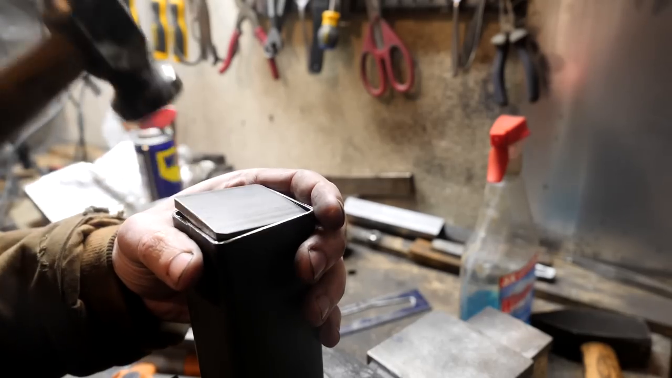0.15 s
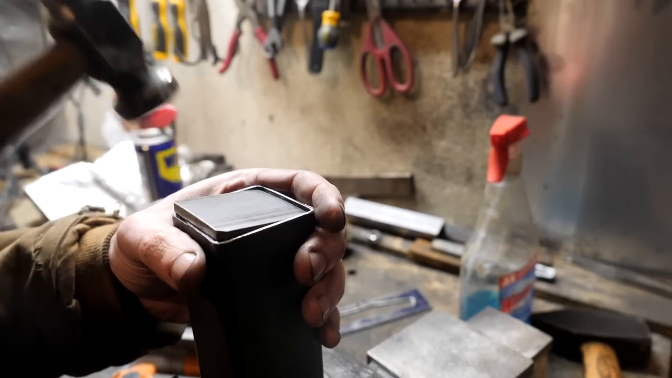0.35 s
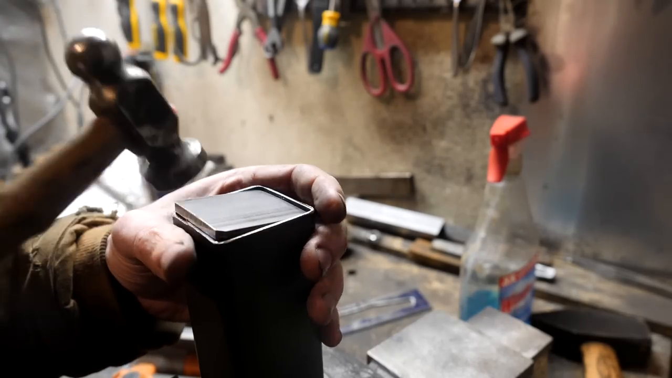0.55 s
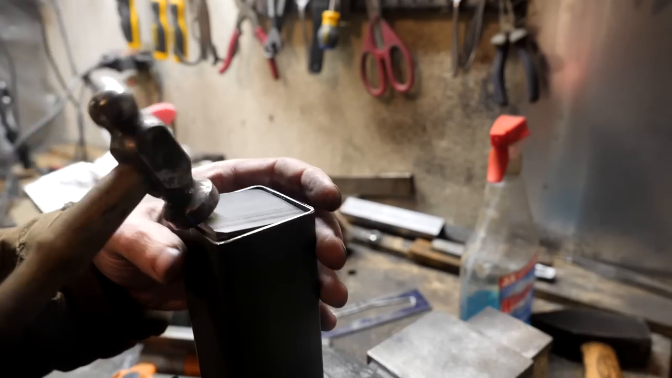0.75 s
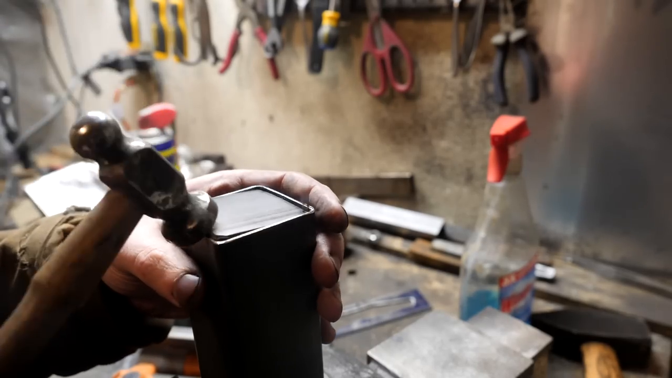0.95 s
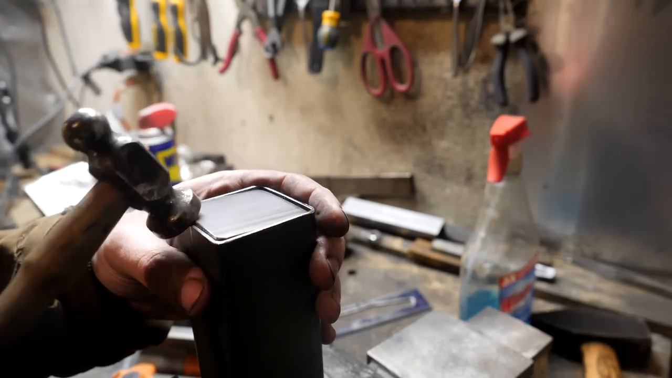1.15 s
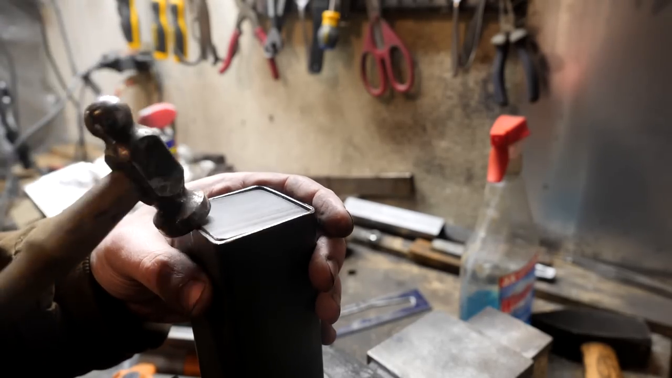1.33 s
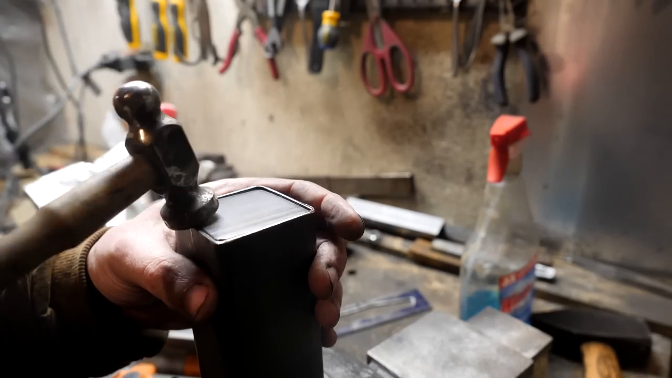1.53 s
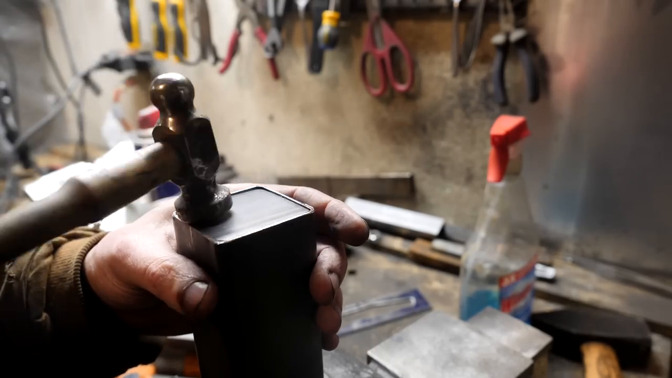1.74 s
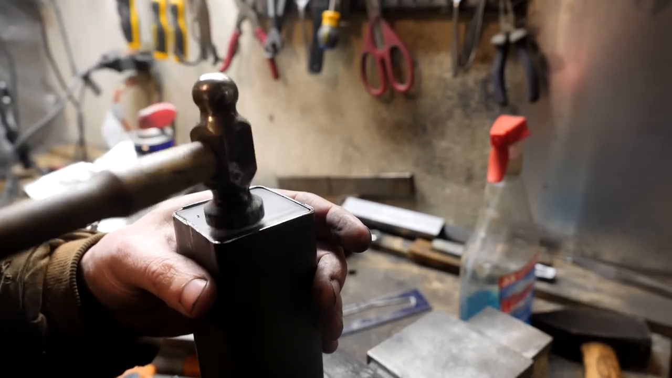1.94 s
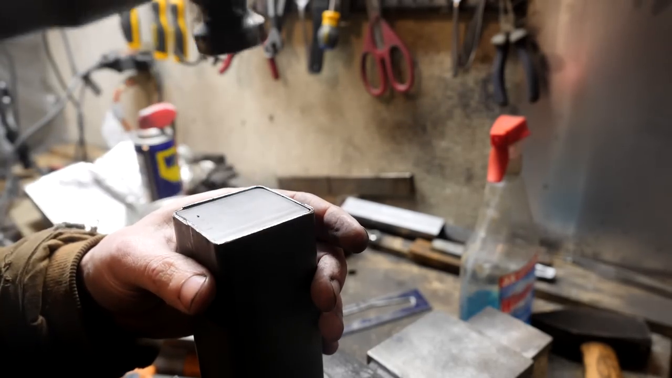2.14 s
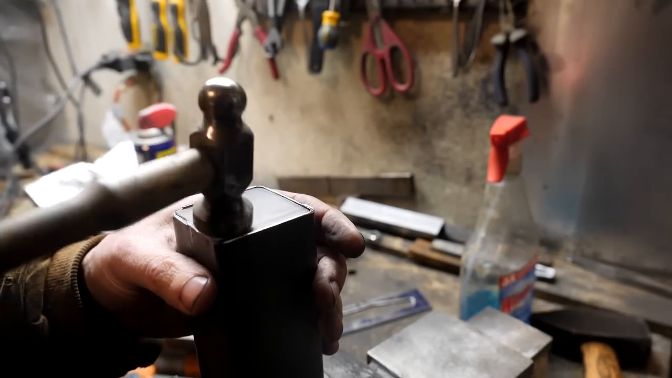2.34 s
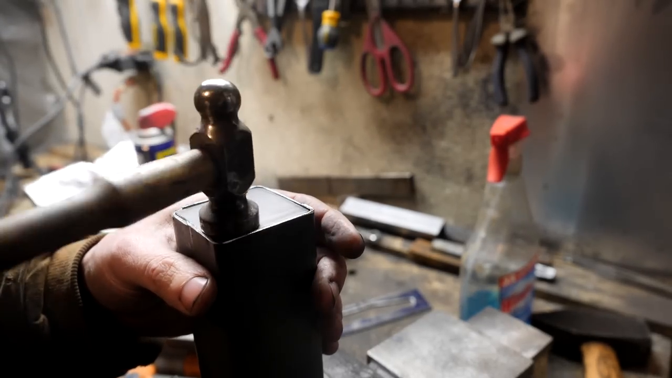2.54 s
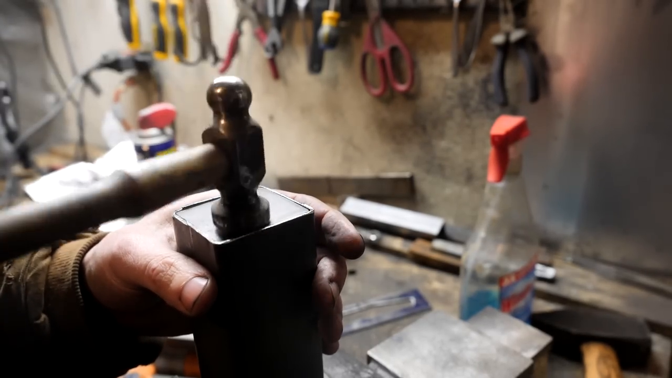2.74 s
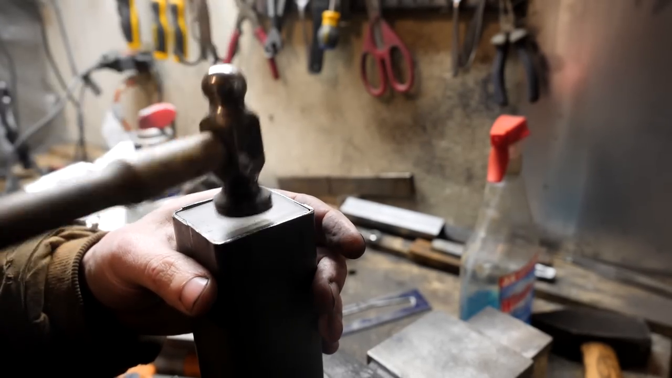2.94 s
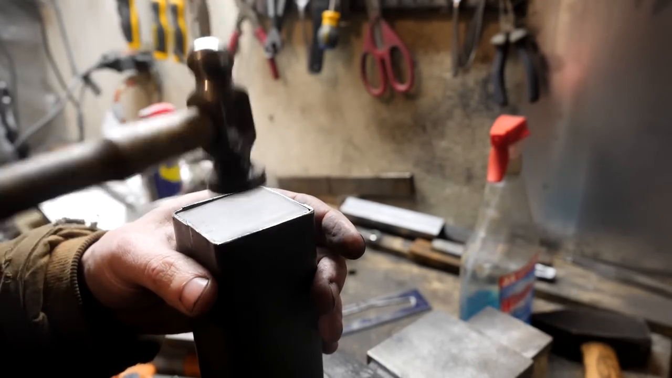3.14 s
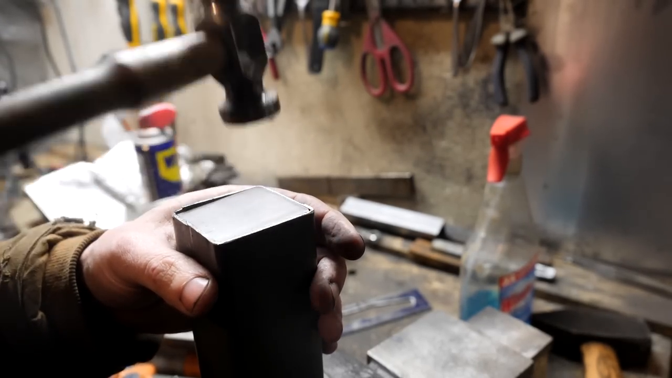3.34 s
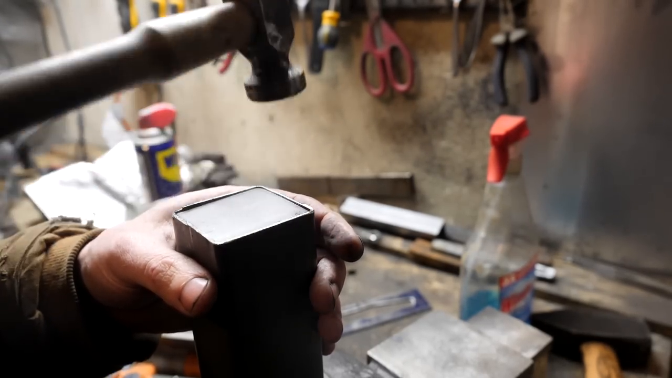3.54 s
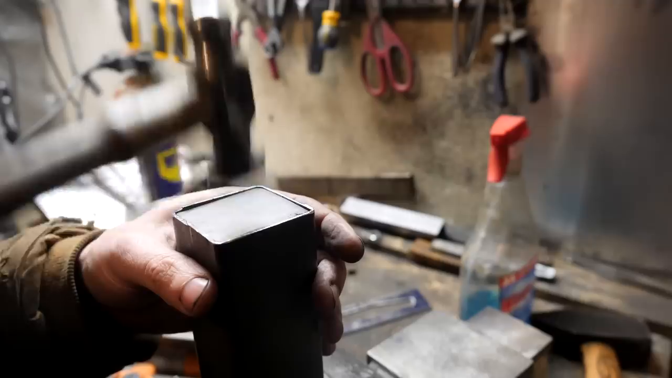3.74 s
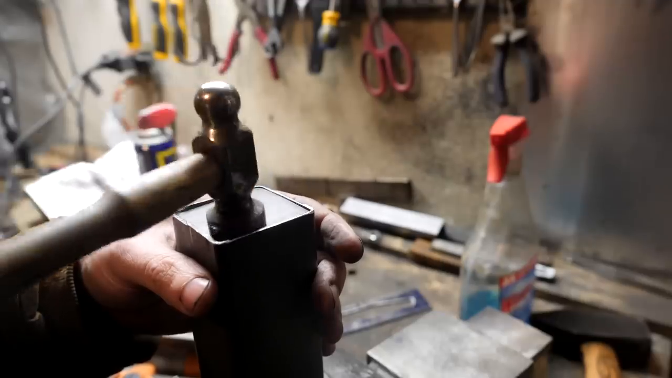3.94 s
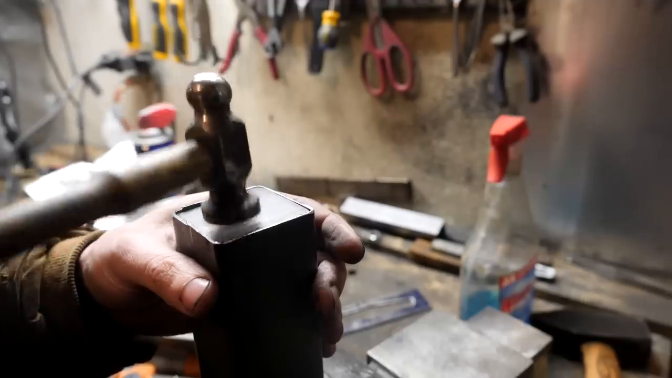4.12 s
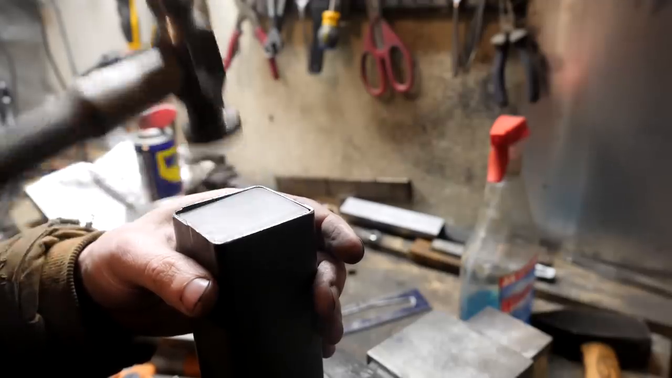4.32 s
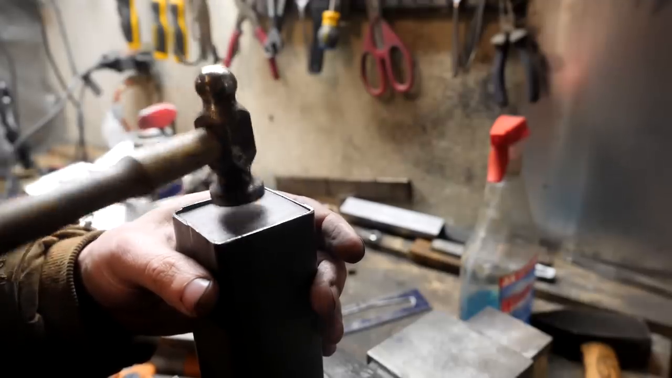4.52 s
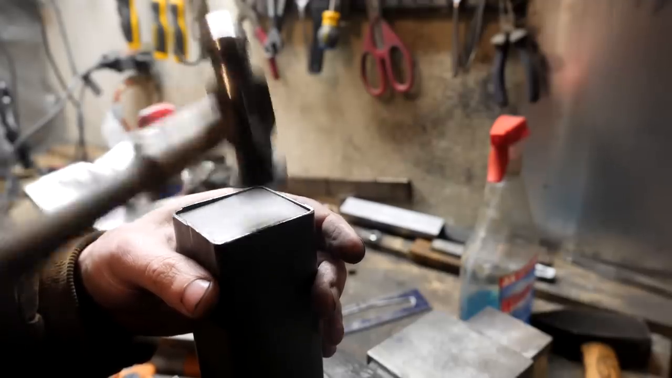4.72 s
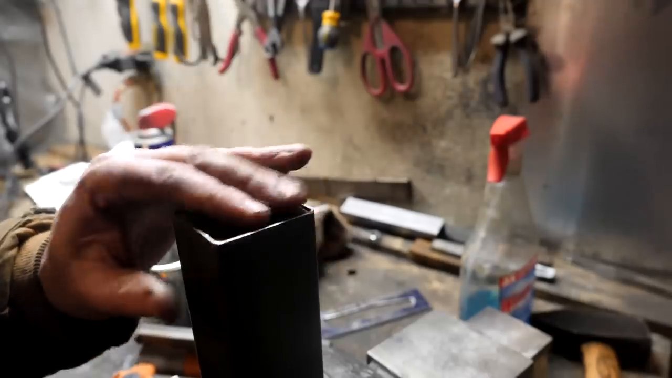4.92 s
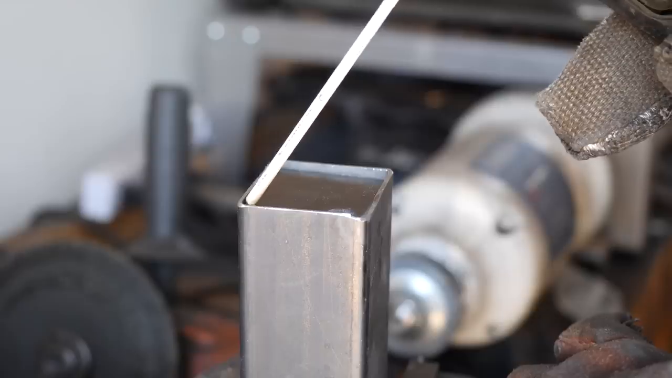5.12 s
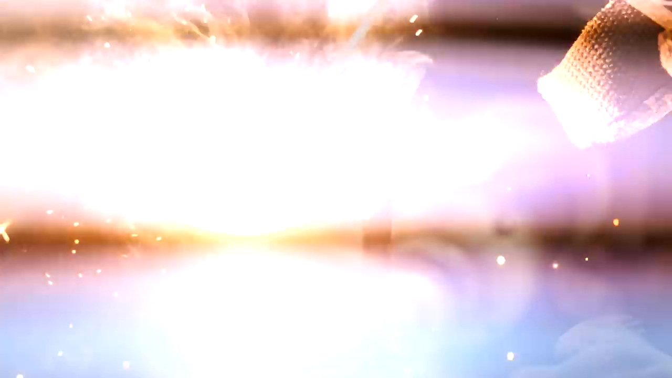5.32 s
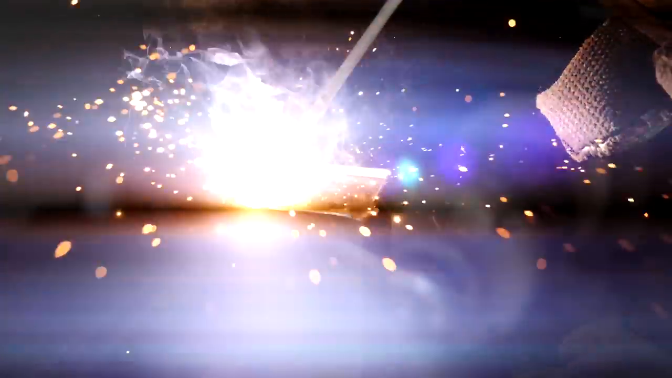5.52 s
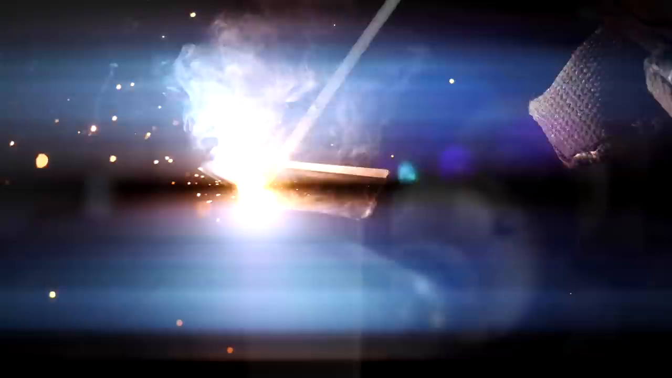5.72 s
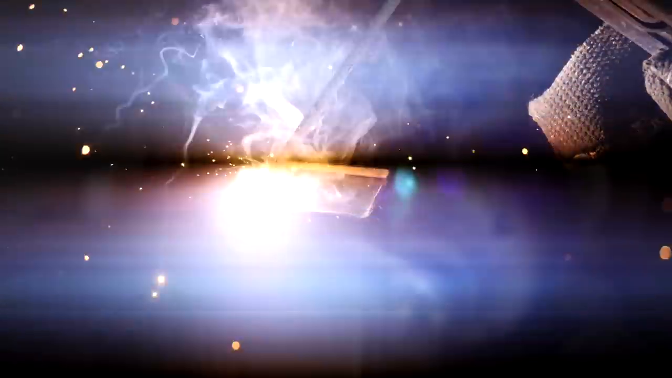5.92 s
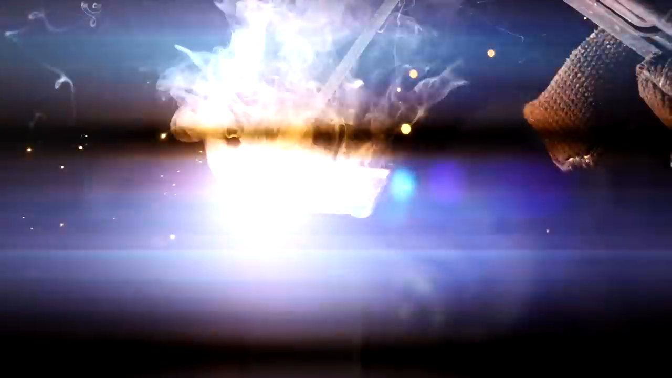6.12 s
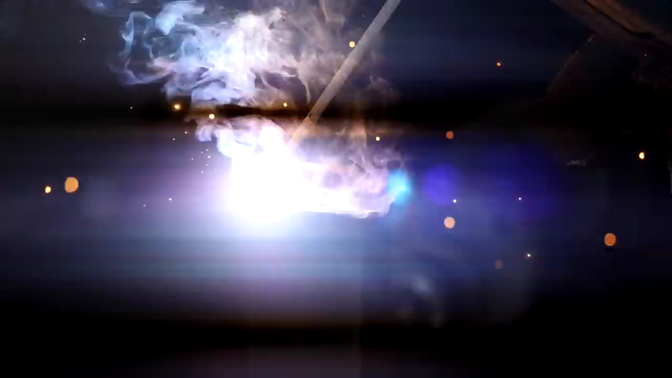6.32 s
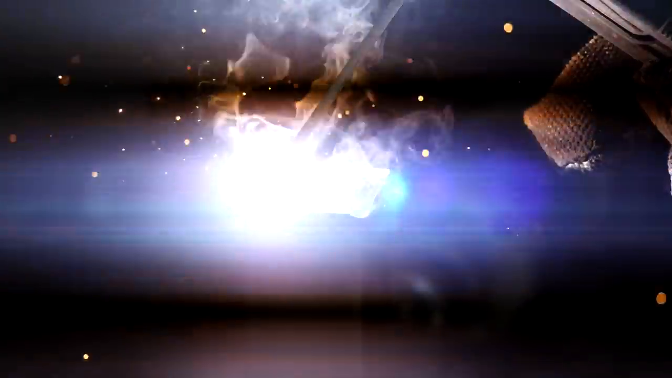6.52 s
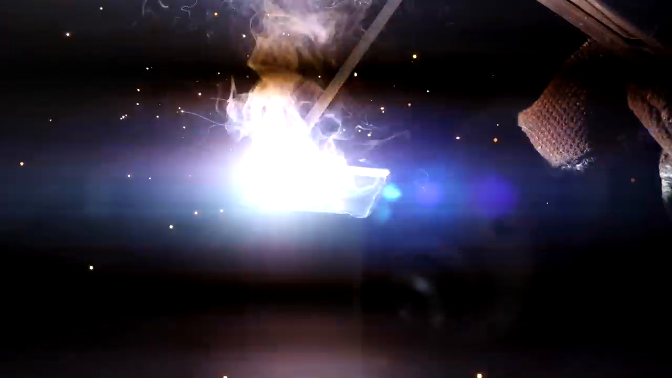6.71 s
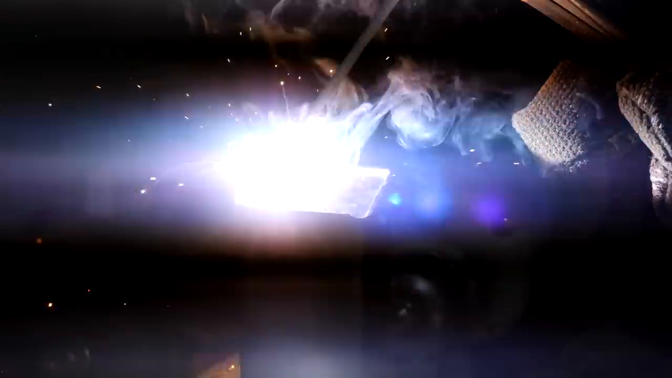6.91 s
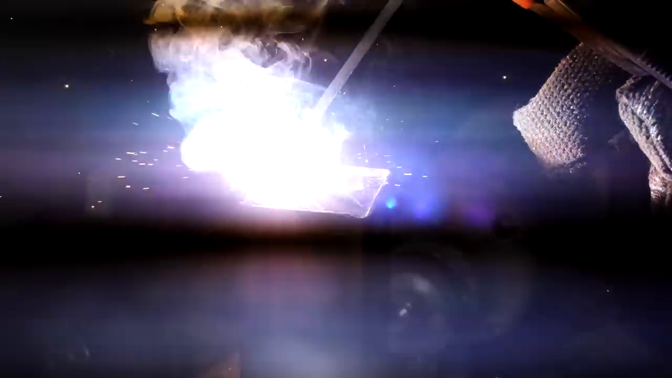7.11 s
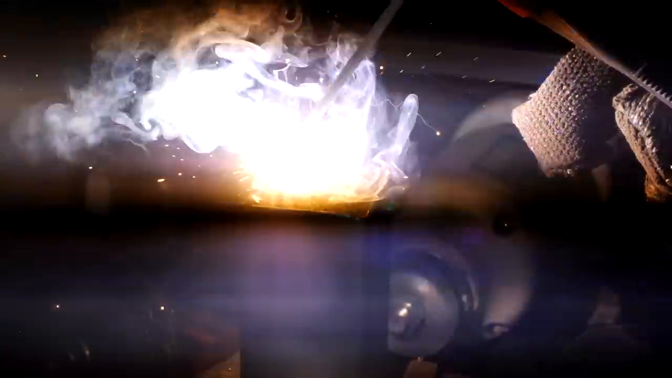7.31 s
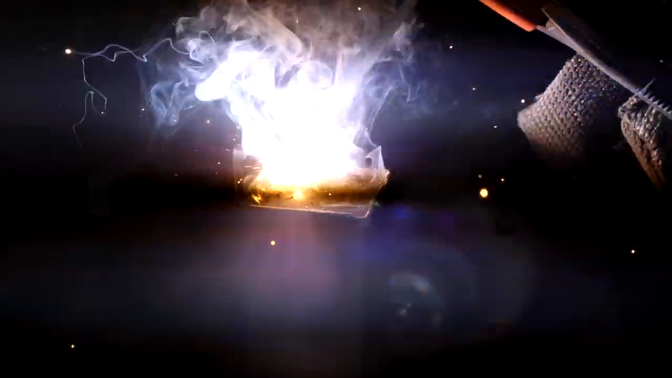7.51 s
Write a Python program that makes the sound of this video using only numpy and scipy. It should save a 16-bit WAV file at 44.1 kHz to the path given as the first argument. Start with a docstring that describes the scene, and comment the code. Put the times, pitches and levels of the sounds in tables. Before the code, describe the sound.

Quick bright hammer blows on hollow steel in a small workshop give way abruptly to a humming welder and a sizzling, popping electric arc.

```python
"""Capping a steel tube

A hammer taps a steel cap into a hand-held square tube in a small workshop; then comes arc welding.
Blows are shaped noise plus dying partials; a limiter ducks each one, so the ringing room swells up behind it.
The welder is unsteady sines plus rushing noise: it idles with a hum and a whine, then surges at the strike.
The arc is rippling noise that settles into a steady hiss with popping drops."""
import sys
import numpy as np
from scipy import signal
from scipy.fft import rfft, irfft, next_fast_len
from scipy.io import wavfile
from scipy.ndimage import uniform_filter1d, minimum_filter1d

SR = 44100
rng = np.random.default_rng(int(sys.argv[2]) if len(sys.argv) > 2 else 0)


def store_pcm(level_fs):
    """Save levels as 16-bit WAV."""
    pcm = np.round(np.clip(level_fs, -1, 1) * 32767).astype(np.int16)
    wavfile.write(sys.argv[1], SR, np.atleast_2d(pcm).T)


N = 337806
TIME = np.arange(N) / SR
EDGE_HZ = 15900


def amp(db):
    """Decibels to gain."""
    return 10 ** (np.asarray(db) / 20)


def evened(x):
    """Scales to rms 1."""
    return x / np.sqrt(np.mean(x ** 2) + 1e-20)


def read(points, hz):
    """Joins table rows on a log-frequency axis."""
    f, value = np.transpose(points)
    return np.interp(np.log(hz + 1), np.log(f + 1), value)


def bump(x, centre, width):
    """A Gaussian peak of height 1, down to 1/e at one width from the centre."""
    return np.exp(-((x - centre) / width) ** 2)


def add(mix, start_s, sound):
    """Mixes a stereo sound in at its start time."""
    part = mix[:, round(start_s * SR):][:, :sound.shape[1]]
    part += sound[:, :part.shape[1]]


def tint(x, colour_db):
    size = next_fast_len(x.shape[1])
    hz = np.fft.rfftfreq(size, 1 / SR)
    spectrum = rfft(x, size) * amp(colour_db(hz)) * (hz < EDGE_HZ)
    return irfft(spectrum, size)[:, :x.shape[1]]


def noise(size, colour_db, same, envelope=1):
    """Coloured stereo noise with a left-right likeness, as strong as the envelope that excites it."""
    def mid_db(hz):
        return colour_db(hz) + 10 * np.log10(1 + np.clip(read(same, hz), 0, 1))

    def side_db(hz):
        return colour_db(hz) + 10 * np.log10(np.clip(1 - read(same, hz), 1e-3, 1))

    mid, side = rng.standard_normal((2, 1, size)) * envelope
    mid, side = tint(mid, mid_db), tint(side, side_db)
    return evened(np.vstack([mid + side, mid - side])) * np.sqrt(np.mean(np.square(envelope)))


def drift(rate_hz):
    """Slow chance of rms 1."""
    size = 2 ** 19
    hz = np.fft.rfftfreq(size, 1 / SR)
    spectrum = rfft(rng.standard_normal(size)) * bump(hz, 0, rate_hz)
    return evened(irfft(spectrum)[:N])


# corners of a blow's contact colour: frequency [Hz]
BLOW_BANDS_HZ = [700, 3000, 7500, 14000]
# direct crack, base colour: (frequency [Hz], relative density [dB])
CRACK_COLOUR = [(40, -15), (150, -13.5), (400, 2), (1200, 3), (2000, -0.5), (3000, 2.5), (5000, 0.5),
                (7000, 3.5), (10000, -1), (14500, 0.5), (15800, 6.5)]
# workshop's answer to a blow, base colour: (frequency [Hz], relative density [dB])
TAIL_COLOUR = [(40, -36), (100, -24.5), (160, -8), (260, -7), (400, 2), (700, -1), (1200, 2.5), (3000, 0.5),
               (7000, 4), (11000, 3), (14000, 3.5), (15800, -3.5)]
# decay of the workshop: (frequency [Hz], t60 [s])
ROOM_T60 = [(150, 0.34), (500, 0.37), (1500, 0.34), (4000, 0.36), (8000, 0.31), (15000, 0.25)]
# modes of the tube and its air: (frequency [Hz], width [Hz], gain [dB])
TUBE_MODES = [(284.7, 13.6, 12.5), (420, 25, 3), (552, 14, -6), (1579, 21, 11), (2200, 16, 6.5),
              (2760, 57, 3), (3040, 27, 5.5)]
# stereo image of the workshop: (frequency [Hz], left-right likeness [0-1])
ROOM_SAME = [(60, 0.96), (250, 0.98), (640, 0.96), (1400, 0.8), (3100, 0.65), (7000, 0.74), (15000, 0.81)]
# a square blow wakes both the ring and the thud of the tube
THUD_DB, THUD_DB_PER_RING_DB, THUD_DB_PER_CLANG_DB = 4.5, 0.14, 0.057
# hard, clanging blows hold less of the top treble
TOP_DB, TOP_DB_PER_FORCE_DB, TOP_DB_PER_CLANG_DB = 0, -0.8, -0.29
# clanging blows crack lower
TILT_DB_PER_OCTAVE, TILT_CHANGE_PER_CLANG_DB = 3.2, -0.061


def blow(force_db, clang_db, ring_hz, ring_db, crack_hz, tube_db):
    """One blow: a crack that dies in milliseconds and the diffuse ringing of tube and room."""
    t = TIME[:SR // 2]
    grid_hz = np.linspace(0, EDGE_HZ, num=60)
    # slight random unevenness of the treble, new for each blow
    uneven_db = 1.73 * rng.standard_normal(len(grid_hz)) * (grid_hz > 2000)
    thud_db = THUD_DB + THUD_DB_PER_RING_DB * tube_db + THUD_DB_PER_CLANG_DB * clang_db - force_db
    top_db = TOP_DB + TOP_DB_PER_FORCE_DB * force_db + TOP_DB_PER_CLANG_DB * clang_db
    tilt_db = TILT_DB_PER_OCTAVE + TILT_CHANGE_PER_CLANG_DB * clang_db

    def contact_db(hz):
        """Where the hammer lands and how tightly the cap sits colour the sound."""
        bands_db = np.interp(np.log(hz + 1), np.log(BLOW_BANDS_HZ), [thud_db, clang_db, 0, top_db])
        return bands_db + ring_db * bump(hz, ring_hz, 1000) + np.interp(hz, grid_hz, uneven_db)

    def direct_db(hz):
        """The close sound is tilted in pitch and has a ring of its own."""
        tilted_db = tilt_db * np.log2((hz + 300) / 5000)
        return read(CRACK_COLOUR, hz) + contact_db(hz) + tilted_db + 6 * bump(hz, crack_hz, 290)

    early = t[:SR // 16]
    crack = noise(len(early), direct_db, [(100, 0.59), (500, 0.92), (3000, 0.72), (15000, 0.95)])
    chatter = bump(early, 0, 0.0034)  # steel on steel
    ring_out = amp(-2.5 - 60 * early / 0.044)
    crack *= amp(-5 + force_db) * (chatter + ring_out)

    diffuse = noise(len(t), lambda hz: read(TAIL_COLOUR, hz), ROOM_SAME)
    hz, age_s, cells = signal.stft(diffuse, SR, nperseg=1024, noverlap=768)
    colour_db = contact_db(hz) + sum(db * bump(hz, f, width) for f, width, db in TUBE_MODES)
    decay_db = -60 * age_s / read(ROOM_T60, hz)[:, None]
    cells = cells * amp(colour_db[:, None] + decay_db)
    tail = signal.istft(cells, SR, nperseg=1024, noverlap=768)[1][:, :len(t)]
    build_up = 1 - np.exp(-t / 0.0017)  # reflections take a moment
    sound = amp(-23.0 + force_db) * tail * build_up
    add(sound, 0, crack)
    return sound


def partial(db, hz, t60_s):
    """One dying mode; the room blurs it into a cluster of close tones."""
    t = TIME[:SR // 2]
    spread_hz, phase = 16 * rng.standard_normal((8, 1)), rng.random((8, 1))
    cluster = np.sin(2 * np.pi * ((hz + spread_hz) * t + phase)).sum(0)
    tone = evened(cluster) / np.sqrt(2)
    return np.tile(amp(db - 60 * t / t60_s) * tone, (2, 1))


# hammer blows: (time [s], force [dB], clang of the cap [dB], cap ring [Hz], cap ring [dB],
# crack ring [Hz], ring of the tube [dB])
BLOWS = [(0.0829, 0, 2.5, 12400, 11, 12600, -25), (0.2909, 0, 1.5, 10500, 4, 11800, -25),
         (0.492, 8, -2, 2260, 6, 10700, -21), (0.822, 3.5, 2.3, 2880, 2.5, 6820, -24),
         (1.004, 2, 0, 11000, 7.5, 10200, -19), (1.1976, 1.5, 6.5, 11100, 7, 3900, -12),
         (1.403, 2.5, 8, 4840, 3, 5100, -15), (1.5892, 1.5, 10, 12300, 6, 5200, -9),
         (1.7795, -1, 10, 12000, 8, 12100, -4.5), (1.9566, -2, 0, 9500, 4, 14700, -14),
         (2.359, -0.8, 7.5, 11500, 4.5, 2750, -2.5), (2.558, 1.5, 9, 4740, 1, 2750, -4),
         (2.754, 0, -0.5, 8200, 6, 14000, -6), (2.936, 0, 1, 9130, 7.5, 8300, -2.5),
         (3.1228, 0.3, 1, 8150, 2, 14700, -3), (3.3024, -0.3, -1, 15000, 7, 14000, -5),
         (3.4747, 0, -5.5, 6850, 3.5, 14100, -9), (3.65, 3.7, 7.5, 4820, 1, 7030, -16),
         (3.826, 2.5, 0.5, 14990, 1, 14300, -8), (3.9841, -3.5, 2.1, 7900, 6.5, 14000, -3.5),
         (4.1344, -2.5, -2, 12230, 2, 12300, -9), (4.277, -1, -5, 2620, 5, 14000, -11),
         (4.4118, 0.5, -0.5, 14500, 1, 15500, -11), (4.5473, 0.2, 0.5, 3880, 5, 3070, -11),
         (4.6784, 0.7, 0.5, 3450, 5.5, 7160, -10), (4.8026, -1.5, 3, 6230, 5, 7350, -7)]
# clear partials of the tube: (frequency [Hz], level before each blow's tube ring is added [dB], t60 [s])
TUBE_RING = [(513, -44, .5), (1587, -31, .38), (2200, -41, .35)]
# loose steel clinks and rings: (time [s], level [dB], centre frequency [Hz], t60 [s])
CLINKS = [(0.2914, -39.5, 1117, 0.37), (.4917, -28, 2260, 0.33), (1.004, -33, 1730, 0.4),
          (2.3602, -41.5, 982, 0.57), (3.904, -28, 5270, 0.049), (3.9035, -23, 7500, 0.024),
          (3.9055, -30, 1700, 0.023), (3.927, -30, 3480, 0.16)]


def hammering():
    """All blows with the tube partials that they wake, plus clinks of loose steel."""
    out = np.zeros((2, N))
    for start_s, *stroke, tube_db in BLOWS:
        add(out, start_s, blow(*stroke, tube_db))
        for hz, db, t60_s in TUBE_RING:
            add(out, start_s, partial(db + tube_db, hz, t60_s))
    for start_s, db, hz, t60_s in CLINKS:
        add(out, start_s, partial(db, hz, t60_s))
    return out


POWER_ON_S, STRIKE_S = 5.151, 5.274
# stages of the weld (idle, rod touch, surge, easing, current drop, steady burn):
# (start [s], glide [s], hum [dB], load [dB], whine [dB], rush of air [dB], arc hiss [dB])
STAGES = [(5.151, 0.00056, 5.5, 2.5, 13, 10, -48), (5.274, .005, -4, 4, -2, -4, -49),
          (5.294, 0.013, 14, 7.5, 2, 12, -48), (5.335, .06, 9.5, 7, 2, 7.5, -47.5),
          (5.412, .022, -3.5, -2, -1, 4.5, -51.8), (5.47, 0.068, 2.5, 0, 2.5, 3, -54)]


def stages():
    """Hum, load, whine, rush and hiss in dB: each stage glides from the one before and holds."""
    levels_db = np.array(STAGES[0][2:])[:, None]
    for start_s, glide_s, *held in STAGES[1:]:
        held_db = np.array(held)[:, None]
        levels_db = levels_db + (held_db - levels_db) * np.clip((TIME - start_s) / glide_s, 0, 1)
    return levels_db


# molten drops at set moments: (time of bridging [s], level before POP_DB [dB])
POPS = [(5.2734, -31), (5.3674, -31), (5.4314, -28), (5.6348, -25), (5.8634, -25.5), (5.9394, -28.5),
        (6.097, -28.5), (6.1448, -26.5), (6.2951, -26), (6.328, -32), (6.345, -30.5), (6.4373, -27.5),
        (6.6405, -25), (6.7843, -27), (6.8341, -27.5), (7.2347, -28), (7.4535, -30)]
DROPS_PER_S, DROP_DB, DROP_SPREAD_DB = 20, -32.5, 2.5  # random drops, level before POP_DB


def drops():
    """Rows (s, dB) of all bursting drops: the set ones and random ones in between."""
    step_s = .005
    moments_s = np.arange(STRIKE_S, TIME[-1], step_s)
    falls = rng.random(len(moments_s)) < DROPS_PER_S * step_s
    sizes_db = DROP_DB + DROP_SPREAD_DB * rng.standard_normal(len(moments_s))
    return list(POPS) + list(zip(moments_s[falls], sizes_db[falls]))


def shorting(pops):
    """0 to 1: the arc falters around the moment when a molten drop bridges the gap and bursts."""
    return np.minimum(sum(bump(TIME, start_s + 0.0019, 0.01) for start_s, db in pops), 1)


# colour of the arc: (frequency [Hz], relative density [dB])
SIZZLE_COLOUR = [(100, -36), (250, -25), (1500, -9), (3000, -7), (4000, -10), (5200, -10), (5800, -3),
                 (6900, -3), (7600, 0), (8500, 1), (9300, -3), (11400, -2.5), (12500, -8), (13900, .5),
                 (15600, -7)]
# hiss while the rod burns, on top of its stage: (time [s], change [dB])
HISS = [(5.5, 1), (5.65, 0.5), (5.9, 0.5), (6.2, 1), (6.3, -1.5), (6.55, -0.5), (6.6, -1.2), (7.4, 1.9),
        (7.55, -3.5), (7.65, -2.5)]
# stereo image of the weld: (frequency [Hz], left-right likeness [0-1])
WELD_SAME = [(100, .6), (300, 0.82), (640, 0.88), (1400, .98), (3100, 0.83), (7000, 0.82), (15000, 0.78)]
POP_DB, POP_DECAY_S, POP_LAG_S = -1.5, .00045, .0011  # a drop bursts one lag after it bridges the gap
PUFF_DB, PUFF_SPREAD_DB, PUFF_WIDTH_S = -78.5, 4, 0.0043


def arc(hiss_db, pops, shorted):
    """Plasma hisses in step with the current ripple; drops choke it and burst with a puff; spatter ticks."""
    level = amp(hiss_db + np.interp(TIME, *np.transpose(HISS), left=0)) * (TIME > STRIKE_S)
    ripple = 1 + 0.2 * np.cos(2 * np.pi * HUM[0][0] * TIME) + 0.34 * np.cos(2 * np.pi * HUM[2][0] * TIME)
    flicker = amp(3.5 + 1.5 * drift(120) + 0.73 * drift(25))
    hiss = flicker * level * ripple * (1 - .3 * shorted)

    spatter = rng.random(N) < 70 / SR  # 70 per second
    spatter_db = 10 + 2.2 * np.minimum(rng.exponential(1, N), 2.5)
    bursts = level * spatter * amp(spatter_db)
    for start_s, db in pops:
        bursts[min(round((start_s + POP_LAG_S) * SR), N - 1)] += amp(db + POP_DB)
    bursts = signal.lfilter([1], [1, -np.exp(-1 / (POP_DECAY_S * SR))], bursts)
    sound = noise(N, lambda hz: read(SIZZLE_COLOUR, hz), WELD_SAME, np.hypot(hiss, bursts))

    push = 0  # soft low puff of air around each drop
    for start_s, db in pops:
        push = push + amp(PUFF_DB + PUFF_SPREAD_DB * rng.standard_normal()) * bump(TIME, start_s, PUFF_WIDTH_S)
    puff_colour = [(30, -3), (200, -4), (600, -25), (4000, -70)]
    puffs = noise(N, lambda hz: read(puff_colour, hz), WELD_SAME, push)
    # the nearby steel mirrors the arc a millisecond later
    mirrored = .27 * np.roll(sound, round(.001045 * SR), axis=1)
    return puffs + sound + mirrored


# harmonics of the mains ripple: (frequency [Hz], base level [dB], share of the load [dB/dB])
HUM = [(480, -65, 1), (720.2, -60, -.7), (960.2, -53, 0), (1200.2, -68, 0), (1440.3, -65, .8),
       (1920.4, -76, .6), (2160.4, -72, 0), (2400.5, -72, 0), (2880.6, -69, -.4)]
# the welder's fan: (mean frequency [Hz], base level [dB])
WHINE = [(754.3, -60), (1508.6, -62), (3017, -77), (3205, -76), (3394, -70)]
# air through the welder's case: (frequency [Hz], relative density [dB])
RUSH_COLOUR = [(40, -50), (150, -42), (260, -23), (420, -4.5), (600, -2.5), (950, 3), (1450, 2.5),
               (1750, -5), (2400, -7), (2900, -1.5), (3600, -7.5), (4300, -7.5), (15000, -23)]
# welding current while the rod burns: (time [s], change [dB])
CURRENT = [(5.5, 3.5), (5.65, 0.5), (6.05, 1.0), (6.15, -1.5), (6.5, 1.2), (6.8, -2), (7.25, -1.7),
           (7.4, 2.5), (7.45, -1.5), (7.65, 0.6)]
LOAD_PER_DB, WHINE_PER_DB, RUSH_PER_DB = 0.5, 0.9, .5  # dB per dB of current


def welder(hum_db, load_db, whine_db, rush_db, shorted):
    """Ripple hum shifts its harmonics under load, an unsteady fan whines, air rushes; all follow the current."""
    burn_start_s, burn_glide_s = STAGES[-1][:2]
    burning = np.clip((TIME - burn_start_s) / burn_glide_s, 0, 1)
    current_db = np.interp(TIME, *np.transpose(CURRENT)) * burning
    hum_db = hum_db + current_db
    load_db = load_db + LOAD_PER_DB * current_db
    whine_db = whine_db + WHINE_PER_DB * current_db
    rush_db = rush_db + RUSH_PER_DB * current_db

    tones = np.zeros(N)
    for hz, db, share in HUM:
        level_db = db + hum_db + share * load_db + 1.3 * drift(35)
        tones += amp(level_db) * np.sin(2 * np.pi * (hz * TIME + rng.random()))
    fan_time = np.cumsum(1 + 0.001696 * drift(9.5)) / SR
    for hz, db in WHINE:
        level_db = db + whine_db + 1.6 * drift(25)
        tones += amp(level_db) * np.sin(2 * np.pi * (hz * fan_time + rng.random()))
    tones = np.sqrt(2) * tones * (1 - 0.36 * shorted)  # they sag while a drop shorts the arc
    rush = amp(-58.5 + rush_db) * noise(N, lambda hz: read(RUSH_COLOUR, hz), WELD_SAME)
    running = np.clip((TIME - POWER_ON_S) / STAGES[0][1], 0, 1)
    return running * (tones + rush)


# the tube shifts and knocks on the bench: (time [s], level [dB], frequency [Hz], t60 [s])
KNOCKS = [(1.817, -35.5, 323, 0.072), (3.882, -25.5, 318, 0.041), (3.9284, -18, 540, 0.014),
          (3.937, -37, 300, 0.25), (3.956, -36, 600, 0.071)]


def knocks():
    """Each knock is a dying low tone with a rough scrape; the tube is too small to radiate deep bass."""
    out, t = np.zeros((2, N)), TIME[:SR // 4]
    for start_s, db, centre_hz, t60_s in KNOCKS:
        scrape = noise(len(t), lambda hz: -3.5 * np.log2((hz + 20) / (0.84 * centre_hz)) ** 2, ROOM_SAME)
        tone = np.sin(2 * np.pi * centre_hz * t)
        add(out, start_s, (tone + 0.92 * scrape) * amp(db - 60 * t / t60_s))
    return signal.sosfilt(signal.butter(4, 200, "highpass", fs=SR, output="sos"), out)


# fingers brush the steel: (centre time [s], half length [s], peak envelope level [dB])
BRUSHES = [(2.28, .012, -69), (2.302, .012, -64.5), (5.067, 0.015, -57.5), (5.096, .008, -70),
           (5.145, 0.016, -60)]


def fingers():
    """Skin slides over the cap with a soft, high hiss."""
    touch = sum(amp(db) * bump(TIME, centre_s, half_s) for centre_s, half_s, db in BRUSHES)
    skin_colour = [(500, -20), (4000, -15), (6000, 2), (10000, -5), (14500, 4.5)]
    return noise(N, lambda hz: read(skin_colour, hz), ROOM_SAME, touch)


# quiet workshop: (frequency [Hz], relative density [dB])
FLOOR_COLOUR = [(30, -22), (90, -14), (160, 0.5), (400, -1.5), (800, -2.5), (1200, 4), (2000, -14),
                (6000, -16.5), (15000, -18)]
# faint wavering whistle: (time [s], mean frequency [Hz])
WHISTLE = [(0, 1117), (.07, 1036), (.75, 1067), (2.15, 1090), (2.25, 1134), (2.35, 1030), (4.98, 1180),
           (5.15, 1043)]


def workshop():
    """Room noise and a thin whistle under the hammering; under the welding, 12 dB quieter noise, no whistle."""
    air = amp(-70.5) * noise(N, lambda hz: read(FLOOR_COLOUR, hz), ROOM_SAME)
    hz = np.interp(TIME, *np.transpose(WHISTLE)) + 9 * drift(60)
    level_db = np.interp(TIME, [0, .7, 2.2, 5], [-62, -70, -68.5, -69]) + 1.7 * drift(25)
    whistle = amp(level_db) * np.sin(2 * np.pi * np.cumsum(hz) / SR)
    return np.where(TIME < POWER_ON_S, air + whistle, amp(-12) * air)


def scene():
    """Hammering over room noise, then welding over a much quieter floor."""
    pops = drops()
    shorted = shorting(pops)
    *machine_db, hiss_db = stages()
    weld = arc(hiss_db, pops, shorted) + welder(*machine_db, shorted)
    return hammering() + weld + knocks() + fingers() + workshop()


def record(dry):
    """A look-ahead limiter drops at once, holds and recovers; then the band limit."""
    ceiling_db, recovery_s, hold_s = -25, .045, 0.014
    power = abs(uniform_filter1d((dry ** 2).mean(0), size=44))
    over_db = np.maximum(10 * np.log10(power + 1e-12) - ceiling_db, 1e-9)
    hold = 2 * round(hold_s * SR / 2) + 1
    # running maximum, shifted to look SR // 900 samples ahead
    held_db = -minimum_filter1d(-over_db, hold, origin=hold // 2 - SR // 900)
    # exponential recovery of the dB reduction
    duck_db = np.exp(np.maximum.accumulate(np.log(held_db) + TIME / recovery_s) - TIME / recovery_s)
    ducked = dry * amp(-uniform_filter1d(duck_db, size=30))
    band_limit = signal.firwin(255, EDGE_HZ, window=("kaiser", 8), fs=SR)
    return signal.oaconvolve(ducked, band_limit[None], "same")


dry = scene()
out = record(dry)
store_pcm(out)
```